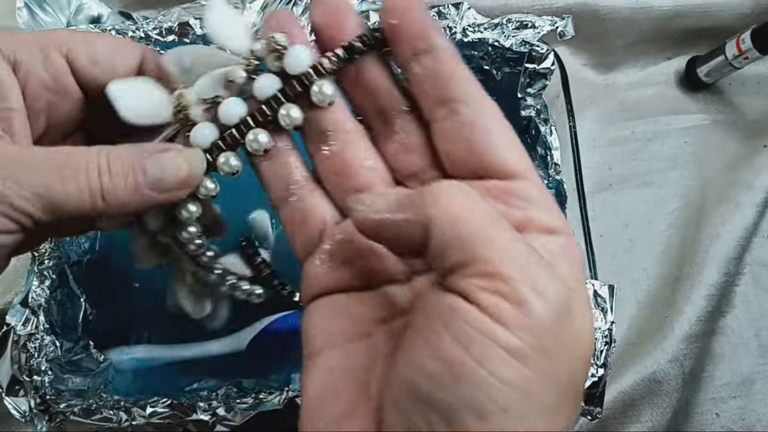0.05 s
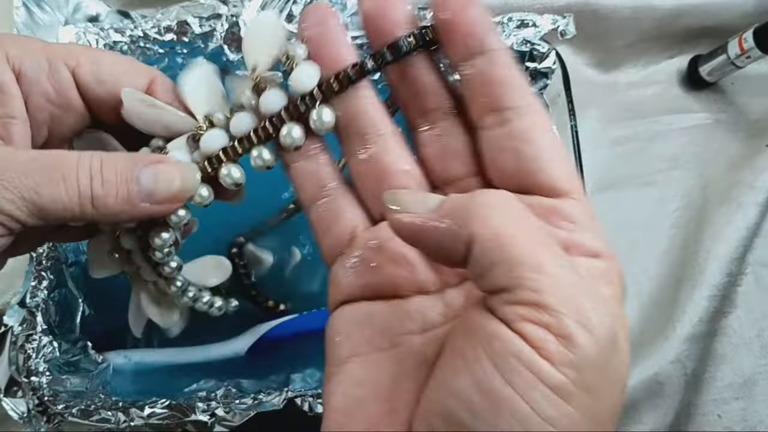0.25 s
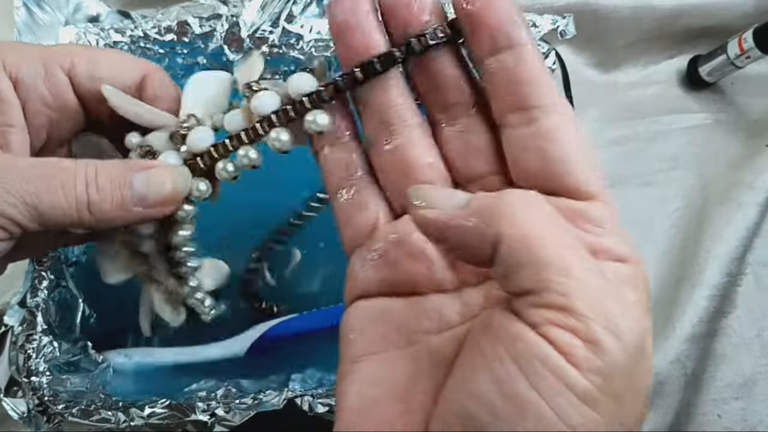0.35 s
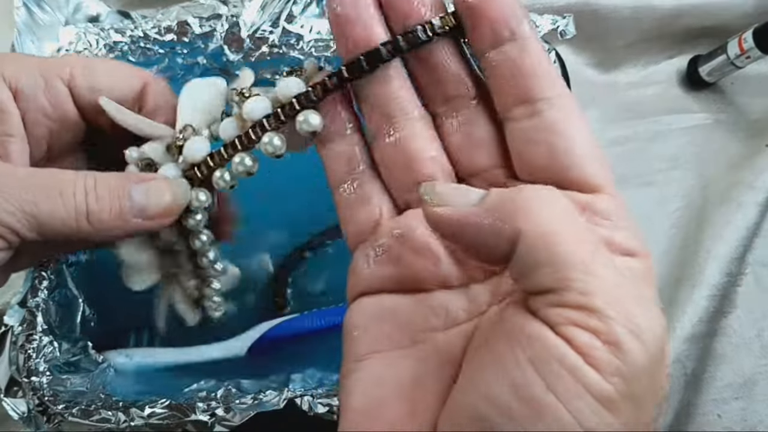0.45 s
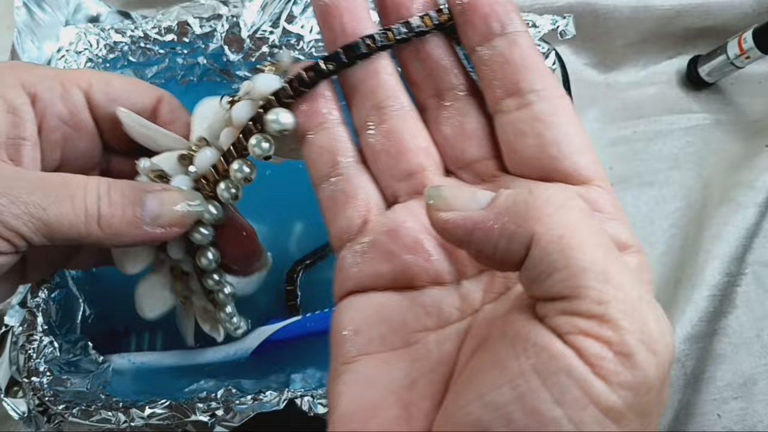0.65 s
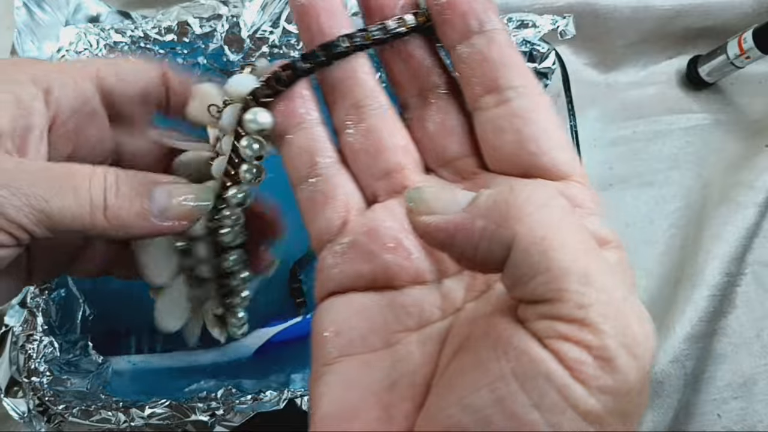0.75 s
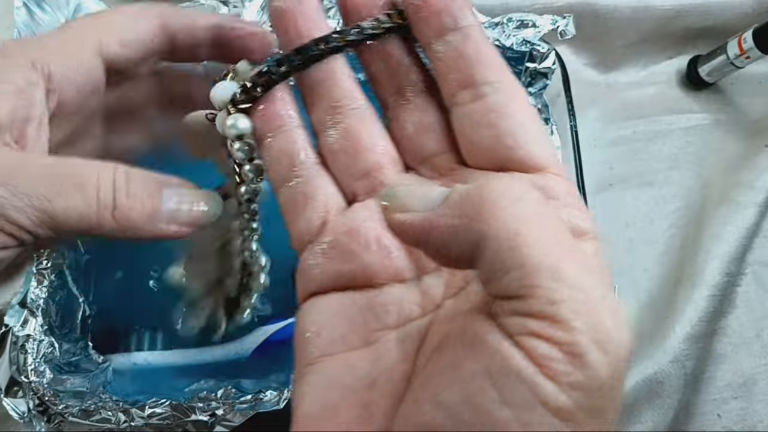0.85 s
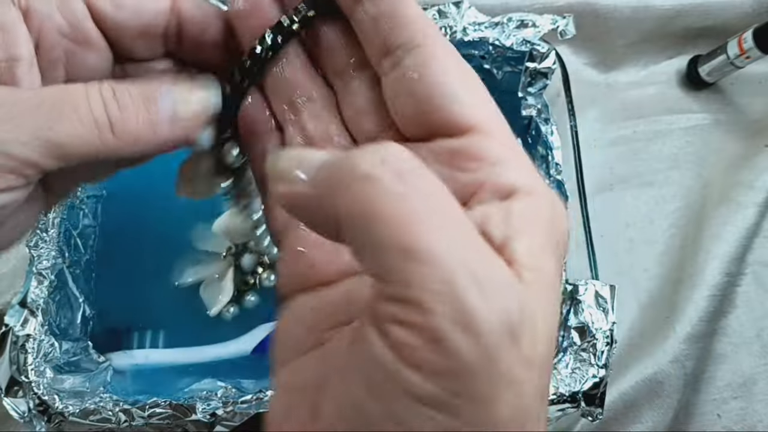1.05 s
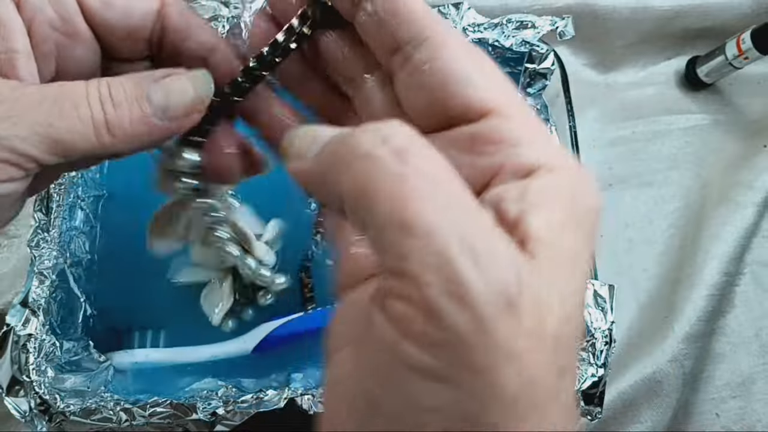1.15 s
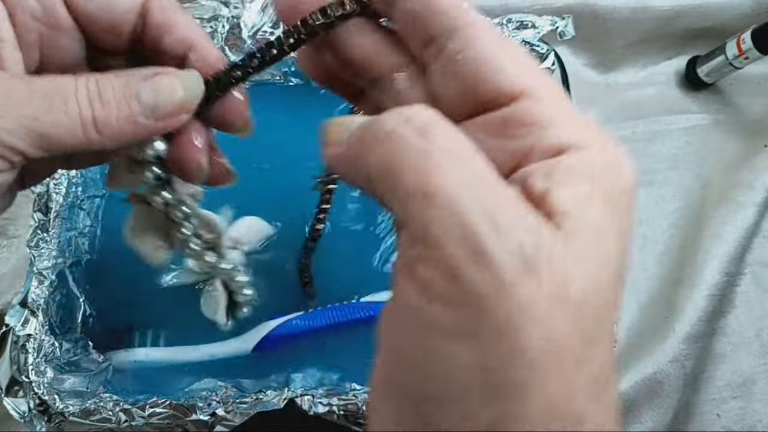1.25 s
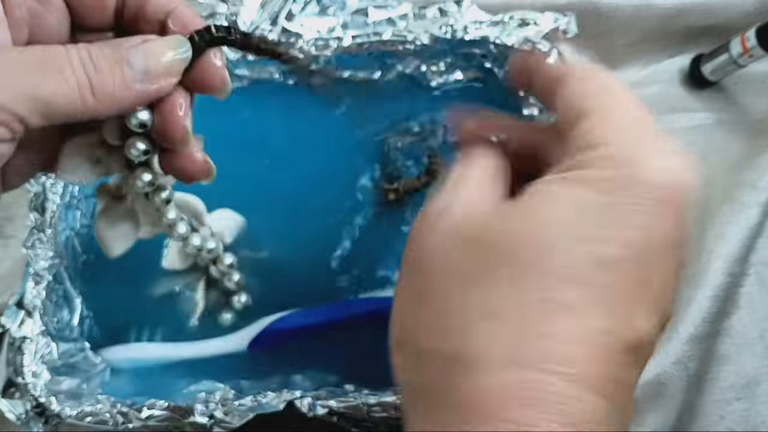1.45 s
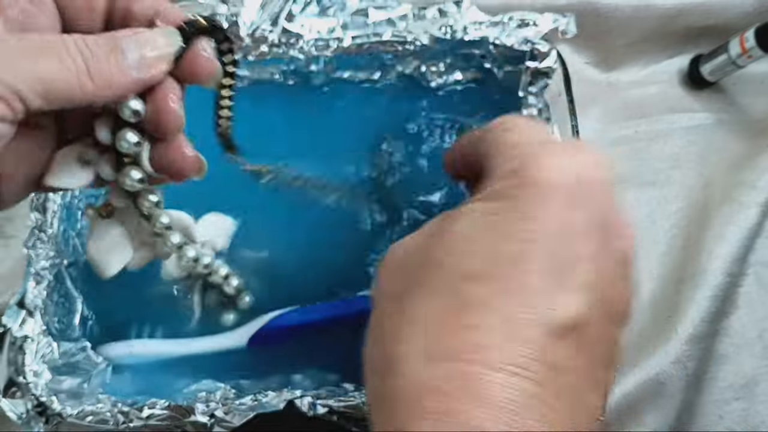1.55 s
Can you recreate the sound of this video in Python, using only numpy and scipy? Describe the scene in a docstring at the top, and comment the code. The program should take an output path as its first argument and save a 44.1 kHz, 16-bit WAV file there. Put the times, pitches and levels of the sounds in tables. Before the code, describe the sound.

A wet beaded metal chain clicks and rattles lightly as fingers handle it.

```python
"""A small room, two microphones close to a foil-lined dish of water, the right one brighter.
A wet metal chain with beads is rubbed and pulled through the fingers above the dish. Links click
together and set the beads ringing, and lighter contacts rattle finely with each stroke. The wet
rubbing squelches with crackle and small bubbles. Behind it are a faint wavering tone, the short
answer of the room and a low hum."""
import sys
import numpy as np
from scipy import signal
from scipy.fft import rfft, irfft
from scipy.io import wavfile
from scipy.ndimage import uniform_filter1d

SR = 44100
rng = np.random.default_rng(int(sys.argv[2]) if len(sys.argv) > 2 else 0)


def output_pcm(signal):
    """Save a mono or channel-first signal as 16-bit PCM at the path in sys.argv[1].

    Samples are clipped to [-1, 1] before scaling.
    """
    pcm = np.clip(np.atleast_2d(signal).T, -1, 1) * 32767
    wavfile.write(sys.argv[1], SR, np.round(pcm).astype(np.int16))


N = 70560

# Links meeting. Each row: start in seconds, energy in dB, ring in Hz, left minus right in dB,
# contact time in milliseconds.
LINK_CLICKS = [(0.0857,-13.5,10400,-27,0.6),(0.1485,-15,10840,-22,0.13),(0.1792,-10,12900,-31,0.15),
               (0.2179,-3,8500,-44,2.2),(0.2332,-3.5,7900,9,0.37),(0.2461,-1.5,9600,-9.5,1),(0.2615,3,7360,-10,0.34),(0.2778,-9.5,6680,-14,0.24),(0.285,1,6870,-2.5,0.12),(0.2997,-3,7700,-4,0.54),
               (0.358,-2,10200,-8,0.51),(0.4038,0.5,8330,-12.5,0.71),(0.4086,-1.5,9900,-9,0.82),(0.4111,0,9400,-3.5,.7),
               (.4645,-21,6250,-6,0.49),(0.511,-3,8950,-9.5,0.33),
               (0.6235,-6.5,9900,-23,0.45),(0.646,-5.5,7700,-19,0.26),(0.6516,0.5,9300,-15,0.36),(0.6665,-1,7400,-5,0.32),(0.706,0,11850,-12.5,0.36),
               (0.739,-1,9900,-5.5,0.64),(0.7562,-3,10300,-23,0.22),(0.8063,-8,9500,-7,1.2),(0.8971,-3.5,9700,-9.5,0.17),
               (0.9232,11.5,9000,-3.5,0.45),(0.932,5.5,6730,9,0.13),(0.961,9,10400,-6.5,0.76),
               (1.0082,-7,8940,7,0.44),(1.0309,-4,9900,-10,0.81),(1.0524,-2,10860,-3,0.6),(1.057,2.5,12100,-23,0.18),(1.0642,2,10000,-3,5.9),(1.093,-4.5,9340,-8,0.54),
               (1.122,-8,9900,-11,0.48),(1.1537,-5.5,11800,-17,0.58),(1.162,-5,9600,-4,0.63),
               (1.1964,-13,8800,-12,0.73),(1.2276,-16,9200,-15,0.61),(1.2854,-12.5,6500,1,0.38),
               (1.3201,-2.5,7940,-6.5,0.62),(1.406,-17.5,5450,-2,1.1),(1.517,-8,9900,-12,0.38)]
# Tone of the links at the microphones. Each row: frequency in Hz, left and right in relative dB.
LINK_SPECTRUM = [(870,-44,-38.5),(1500,-26.5,-27),(2650,-19.5,-16),(4410,-9,-6.5),(5970,-9.5,-4),(6270,-4,-3.5),(7870,-6.5,-8),(8790,-3,-3),(9690,-15,1.5),(13660,-17.5,-6.5),(15800,-19,-16)]
# Longer rings of the beads. Each row: frequency in Hz, gain in dB.
BEAD_RINGS = [(3400,-12),(6250,1.5),(8500,-10.5)]
# Strokes of the fine rattle. Each row: time in seconds, level in dB.
RATTLE_LEVEL = [(0,-63),(.06,-45),(.15,-60),(.225,-35),(.29,-37),(.345,-50.5),(.40,-48.5),(.505,-57.5),(.523,-34),(.55,-78),(.595,-58.5),(.64,-37.5),(.72,-42),(.82,-38.5),(.89,-45.5),(.945,-30),(1.01,-47.5),(1.07,-36),(1.11,-47.5),(1.245,-50.5),(1.29,-46),(1.35,-54),(1.46,-52),(1.6,-63)]
# Where the rattle sits between the microphones. Each row: time in seconds, left minus right in dB.
RATTLE_BALANCE = [(.2,-21.5),(.24,-5.5)]
# Strokes of the wet rubbing. Each row: time in seconds, level in dB.
RUB_LEVEL = [(.02,-75.5),(.12,-63.5),(.18,-78),(.24,-56.5),(.31,-74.5),(.61,-85.5),(.79,-73),(.815,-53),(1.01,-65.5),(1.07,-58),(1.2,-75.5),(1.44,-65.5),(1.56,-68.5)]
# Tone of the wet crackle. Each row: frequency in Hz, relative level in dB.
RUB_SPECTRUM = [(300,-15),(850,-18),(1150,2.5),(1850,-5),(2250,1.5),(5000,-5.5),(9000,-33.5)]
# Small bubbles and wet squeaks. Each row: start in seconds, pitch in Hz, level in dB, decay in seconds.
BUBBLE_PINGS = [(.754,2640,-43.5,0.0018),(.808,5300,-32.5,0.0019),(.865,2193,-45,0.0048),(.877,2076,-35.5,0.002)]
# Room tone. Each row: frequency in Hz, relative level in dB.
HUM_SPECTRUM = [(68,1),(95,-10),(130,-0.5),(180,-15),(400,-21.5),(16000,-29.5)]

WET_PAN_DB = -6  # left minus right: rubbing, bubbles and the faint tone sit to the right
LEFT_LAG_S = 0.0011996


def link_clicks(ring_width_hz=4500, crack_db=-12.5, scrape_ms=0.38, count=2048):
    """Two links meet in a brief crack, with a quickly damped ring that passes into the beads."""
    out, t = np.zeros((2, N)), np.arange(count) / SR
    for start, db, hz, pan_db, contact_ms in LINK_CLICKS:
        age = t / (contact_ms / 1000)
        burst = stereo_noise(count) * np.sqrt(age) * np.exp(-age)
        scrape = min(contact_ms / scrape_ms, 2)  # longer contacts scrape and sound broader
        link = signal.iirpeak(hz, hz / (ring_width_hz * np.sqrt(scrape)), SR)
        ring = signal.lfilter(*link, signal.lfilter(*link, burst))
        knock = ring + undb(crack_db) * scrape ** 2 * burst
        click = link_colour(knock + bead_ring(knock)) / np.sqrt(2 * count)
        add(out, start, click * sides(pan_db) * undb(db))
    return out


def bead_ring(knock, t60_s=0.056, detune=0.025):
    """The beads ring on after a knock, each a little differently tuned."""
    out = 0
    for hz, db in BEAD_RINGS:
        hz = hz * (1 + detune * rng.standard_normal())
        q = np.pi * hz * t60_s / np.log(1000)
        out = out + undb(db) * signal.lfilter(*signal.iirpeak(hz, q, SR), knock)
    return out


def link_colour(pair):
    """The bright ring of small metal links as each microphone hears it, at rms 1."""
    hz, left_db, right_db = np.array(LINK_SPECTRUM).T
    return np.array([unit(colour(pair[0], hz, left_db)), unit(colour(pair[1], hz, right_db))])


def link_rattle(max_ticks_per_s=820, low_hz=5290, high_hz=12350, pitches=6, q=8.4, crack_db=-5.5):
    """Many light link contacts at several pitches swell, crowd and brighten with each stroke."""
    effort = curve(RATTLE_LEVEL)
    firmness = effort / (effort + undb(-43))  # strokes lighter than this level lose their top
    rate = max_ticks_per_s * np.sqrt(firmness) / pitches
    ticks = 0
    for hz in np.geomspace(low_hz, high_hz, pitches):
        contacts = grains(rate, spread_db=6.5, decay_s=0.00047)
        ring = signal.lfilter(*signal.iirpeak(hz, q, SR), contacts)
        ticks = ticks + ring + undb(crack_db) * contacts
    hard = link_colour(ticks)
    soft = signal.sosfiltfilt(signal.butter(4, 11960, fs=SR, output="sos"), hard)
    left_over_right = curve(RATTLE_BALANCE)
    pan = np.array([left_over_right, np.ones(N)]) * np.sqrt(2 / (1 + left_over_right ** 2))
    return (soft + firmness * (hard - soft)) * effort * pan


def wet_rub(blip_count=240, low_hz=1296, high_hz=2730, blip_s=0.0015, blip_db=-2):
    """The wet chain slides under the fingers with a duller crackle and tiny water blips."""
    friction = grains(rate=1000, spread_db=5, decay_s=0.00087)
    crackle = np.array([colour(channel, *np.array(RUB_SPECTRUM).T) for channel in friction])
    blip_rows = [(when * N / SR, low_hz * (high_hz / low_hz) ** pitch, -10 * weakness, blip_s)
                 for when, pitch, weakness in rng.random((blip_count, 3))]
    blips = undb(blip_db) * unit(bubbles(blip_rows))
    return (unit(crackle) * sides(WET_PAN_DB) + blips) * curve(RUB_LEVEL)


def bubbles(rows, rise_per_s=1):
    """Each small bubble is a softly starting damped tone that glides slightly upward."""
    out, t = np.zeros(N), np.arange(N // 8) / SR
    for start, hz, db, decay_s in rows:
        envelope = t / decay_s * np.exp(1 - t / decay_s)
        tone = np.sin(2 * np.pi * hz * t * (1 + rise_per_s * t / 2))
        add(out, start, undb(db) * envelope * tone)
    return out * sides(WET_PAN_DB)


def faint_tone(hz=645, waver=0.056, level_db=-77, start_s=0.94, length_s=0.41):
    """A faint, rough tone well below the links wavers in pitch as it swells and fades."""
    progress = np.clip((np.arange(N) / SR - start_s) / length_s, 0, 1)
    swell = np.maximum(np.sin(np.pi * progress), 0) ** (1 / 4)
    wander = unit(uniform_filter1d(rng.standard_normal(N), size=SR // 20))
    roughness = unit(uniform_filter1d(rng.standard_normal(N), size=SR // 100))
    tone = np.sin(2 * np.pi * np.cumsum(hz * (1 + waver * wander)) / SR)
    return undb(level_db) * swell * unit(tone * (1 + roughness / 2)) * sides(WET_PAN_DB)


def reflections(direct, t60_s, level_db, start_s, top_hz=12600):
    """Sound returns from nearby surfaces as a dense dying tail, different at each microphone."""
    t = np.arange(SR // 2) / SR
    tail = rng.standard_normal((2, len(t))) * np.exp(-np.log(1000) * t / t60_s) * (t > start_s)
    tail = signal.lfilter(*signal.butter(2, top_hz, fs=SR), unit(tail))
    return undb(level_db) * signal.fftconvolve(direct, tail / np.sqrt(len(t)), axes=1)[:, :N]


def room_hum(level_db=-74.5, side_db=-5):
    """The room hums low and steady, with a trace of hiss."""
    hz, db = np.array(HUM_SPECTRUM).T
    mid, side = (unit(colour(noise, hz, db, size=8192)) for noise in rng.standard_normal((2, N)))
    return undb(level_db) * (mid + undb(side_db) * side * np.array([[1], [-1]]))


def grains(rate, spread_db, decay_s):
    """Tiny noise bursts of uneven strength, `rate` a second, held to a steady average level."""
    struck = rng.random(N) < rate / SR
    strength = undb(spread_db * np.minimum(rng.exponential(size=N), 3.3))
    pole = np.exp(-2 / (decay_s * SR))
    power = signal.lfilter([1], np.poly([pole, pole]), struck * strength ** 2)  # each swells and fades
    mean_power = uniform_filter1d(power, size=2200)
    return np.sqrt(np.abs(power) / (np.abs(mean_power) + 1e-9)) * stereo_noise(N)


def stereo_noise(count, shared=0.68):
    """Noise at the two microphones, with part of its power common to both."""
    noise = rng.standard_normal((3, count))
    return np.sqrt(shared) * noise[0] + np.sqrt(1 - shared) * noise[1:]


def colour(x, hz, db, size=2048):
    """Minimum-phase filter through points in Hz and dB."""
    bins_hz = np.maximum(np.fft.rfftfreq(size, 1 / SR), 1)
    gain = undb(np.interp(np.log(bins_hz), np.log(hz), db))
    cepstrum = irfft(np.log(gain))
    cepstrum[1:size // 2] *= 2
    cepstrum[size // 2 + 1:] = 0
    return signal.fftconvolve(x, irfft(np.exp(rfft(cepstrum))))[:len(x)]


def undb(db):
    """Decibels to gain."""
    return 10 ** (np.asarray(db) / 20)


def unit(x):
    """Scale to rms 1."""
    return x / np.sqrt(np.mean(x ** 2))


def curve(rows):
    """Gain over time from points in seconds and dB."""
    return undb(np.interp(np.arange(N) / SR, *np.array(rows).T))


def sides(pan_db):
    """Left and right gains of constant power."""
    return unit(undb(np.array([[pan_db], [-pan_db]]) / 2))


def add(out, start, x):
    """Mix a sound in at a time in seconds."""
    i = max(int(start * SR), 0)
    out[..., i:i + x.shape[-1]] += x[..., :max(N - i, 0)]


def scene():
    """The chain, close up, reaches the left microphone slightly late; dish, hands and room answer."""
    left, right = link_clicks() + link_rattle() + bubbles(BUBBLE_PINGS) + faint_tone() + wet_rub()
    left = np.pad(left, (int(LEFT_LAG_S * SR), 0))[:N]
    direct = np.array([left, right])
    dish_and_hands = reflections(direct, t60_s=0.01, level_db=-4.5, start_s=0.001)
    room = reflections(direct, t60_s=0.14, level_db=-10, start_s=0.0038)
    return direct + dish_and_hands + room + room_hum()


def record(dry):
    """The recorder rounds the sharpest peaks and cuts the top."""
    ceiling, top_hz = 0.85, 16700
    rounded = ceiling * np.tanh(dry / ceiling)
    return signal.sosfilt(signal.ellip(8, .2, 70, top_hz, fs=SR, output="sos"), rounded)


dry = scene()
out = record(dry)
output_pcm(out)
```